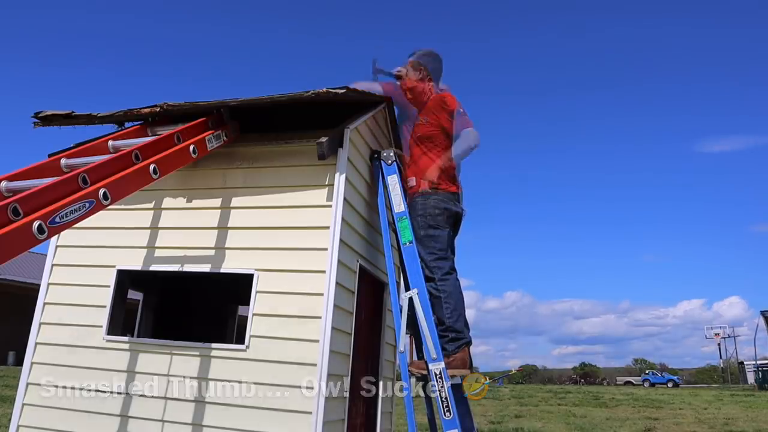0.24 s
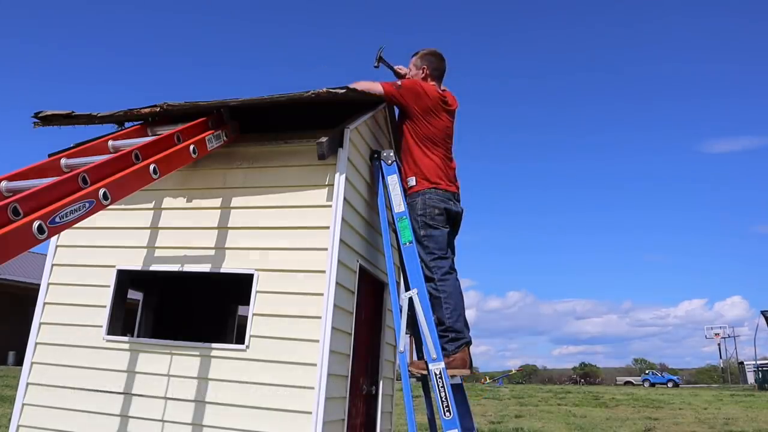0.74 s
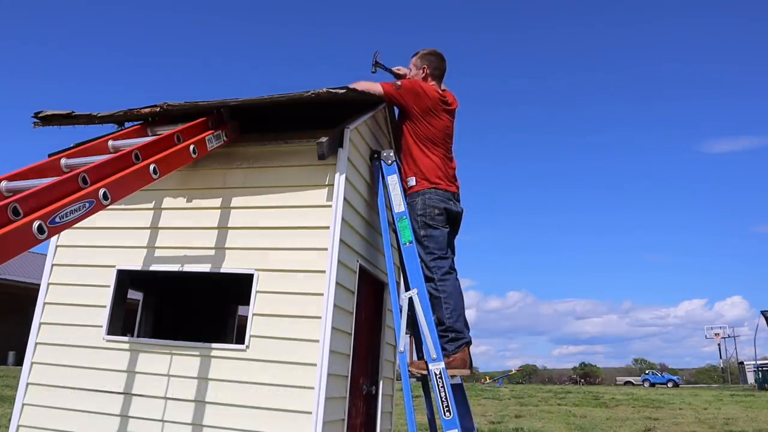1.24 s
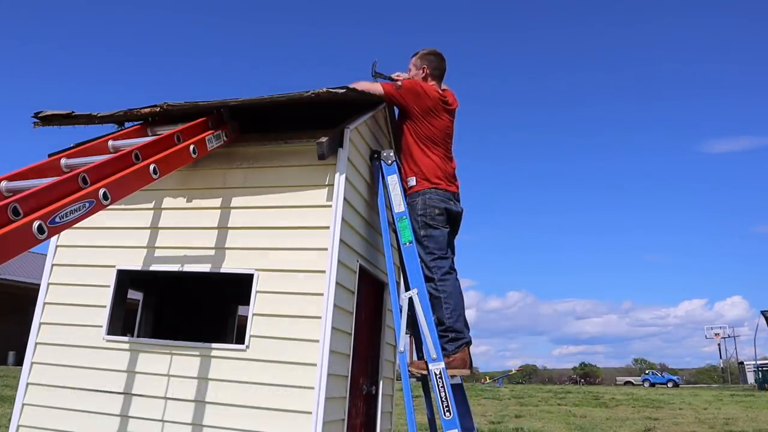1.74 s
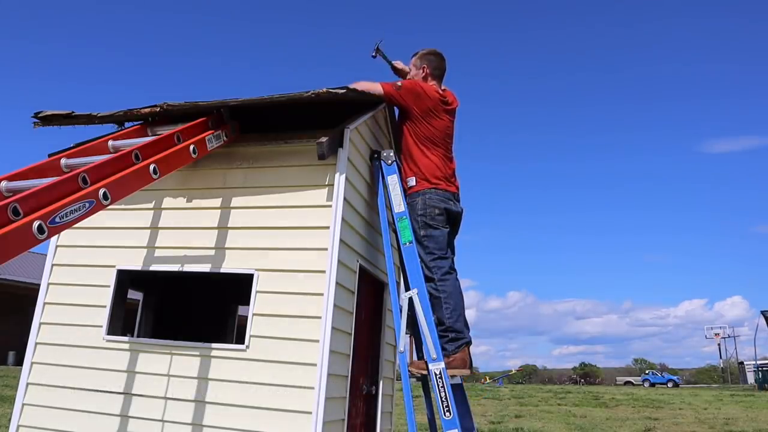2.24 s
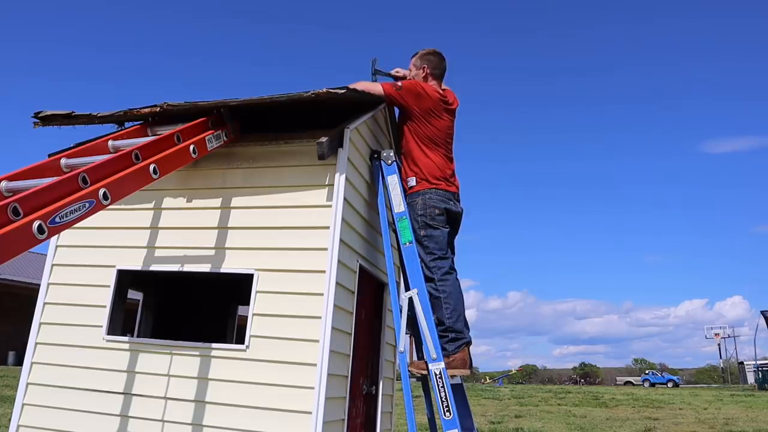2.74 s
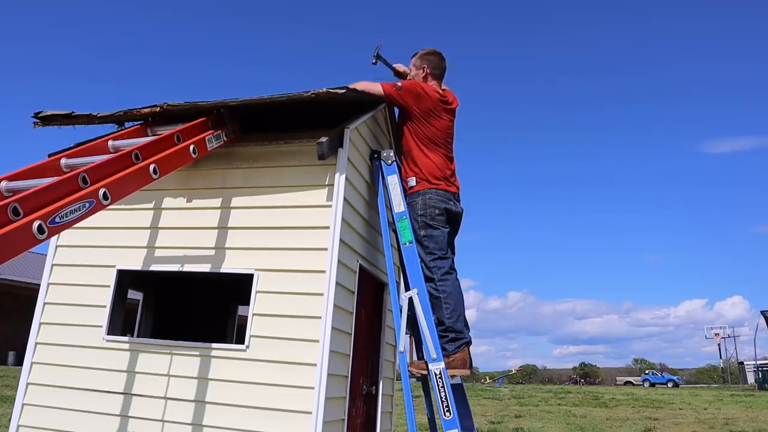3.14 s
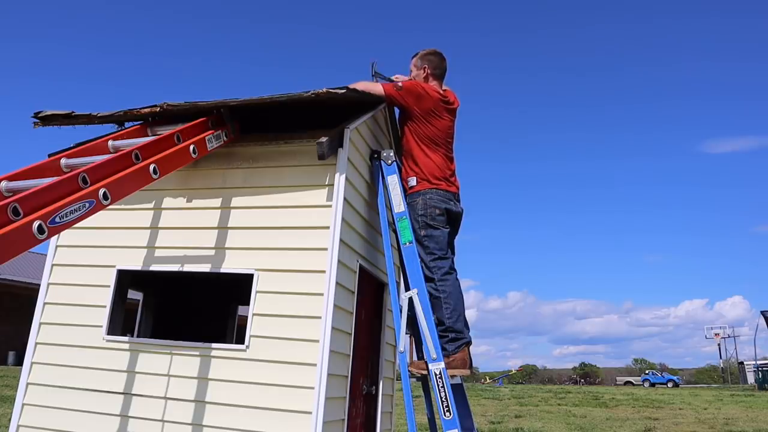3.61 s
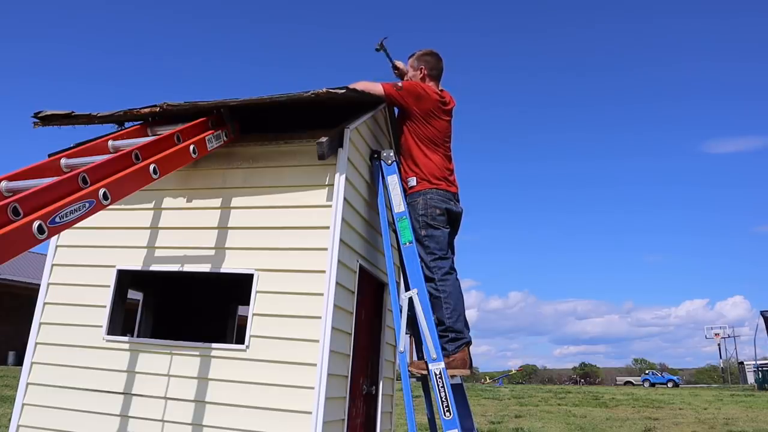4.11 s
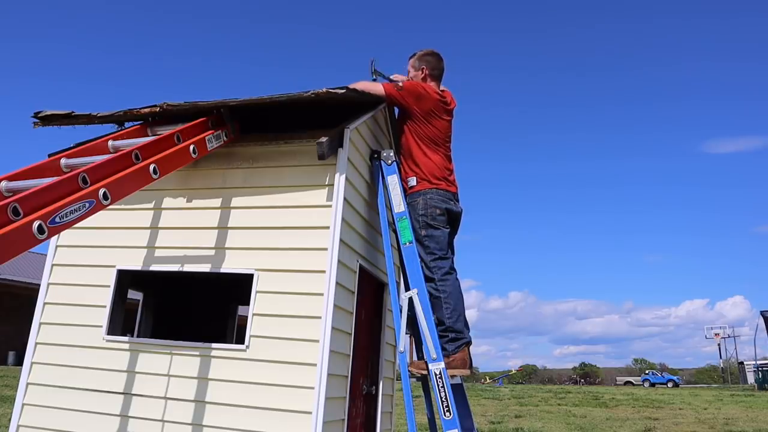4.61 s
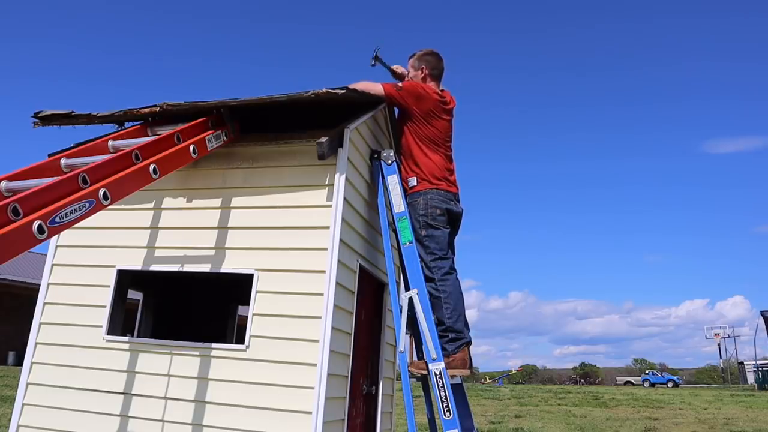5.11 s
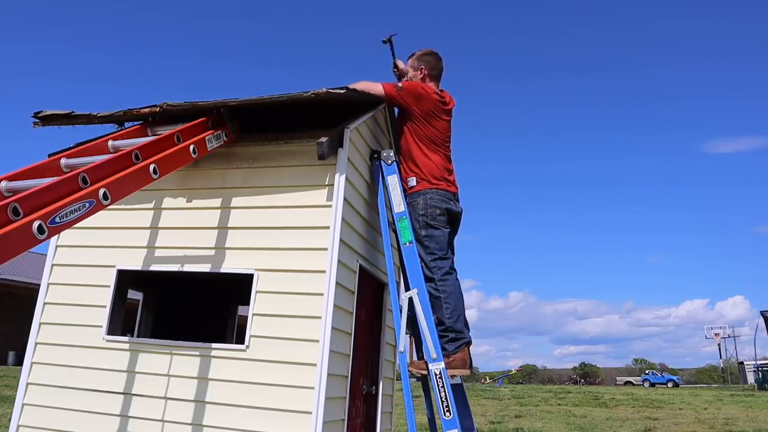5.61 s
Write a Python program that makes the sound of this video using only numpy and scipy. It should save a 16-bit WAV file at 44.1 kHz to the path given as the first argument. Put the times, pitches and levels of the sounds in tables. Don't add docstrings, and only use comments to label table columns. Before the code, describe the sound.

Outdoors on open grass, a hammer drives nails into a small shed's plank roof, heard from some metres away. Sharp, woody blows come about three a second, with hollow boom, rattle and faint ladder hum. Around four seconds one blow skids off with a twang and a loose shingle slaps; hammering resumes slightly slower and brighter. Wind buffets the microphone strongly at first, with faint traffic and hiss behind.

```python
import sys
import numpy as np
from scipy import signal
from scipy.fft import rfft, irfft, next_fast_len
from scipy.io import wavfile
from scipy.ndimage import map_coordinates

SR = 44100
rng = np.random.default_rng(int(sys.argv[2]) if len(sys.argv) > 2 else 0)


def amplitude_ratio(level_db):
    exponent = np.asarray(level_db, float) / 20
    return 10 ** exponent


def materialize(psi):
    bounded = np.clip(np.atleast_2d(psi).T, -1, 1)
    quanta = np.round(bounded * 32767).astype(np.int16)
    wavfile.write(sys.argv[1], SR, quanta)


N = 258426
LEAD = 0.005


def unit(x):
    return x / np.sqrt(np.mean(x ** 2) + 1e-20)


def scaled(x, t, length):
    return x / np.sqrt(np.mean(x[(t > 0) & (t < length)] ** 2))


def along(points, hz):
    f, v = np.transpose(points)
    return np.interp(np.log(hz + 1), np.log(f + 1), v)


def fade(t, t60):
    return amplitude_ratio(-60 * t / t60)


def sine(hz, t):
    return np.sin(2 * np.pi * hz * t)


def wobble(rate):
    knots = rng.standard_normal(int(N * rate / SR) + 4)
    return map_coordinates(knots, [np.arange(N) * rate / SR])


def filtered(x, response):
    m = next_fast_len(len(x) + 4096)
    return irfft(rfft(x, m) * response(np.fft.rfftfreq(m, 1 / SR)), m)[:len(x)]


def noise(spectrum, size):
    return unit(filtered(rng.standard_normal(size), lambda hz: amplitude_ratio(along(spectrum, hz))))


def add(track, s, sound):
    part = track[round(s * SR):][:len(sound)]
    part += sound[:len(part)]


# (frequency [Hz], level [dB per Hz])
WIND = [(12, -39), (20, -16), (75, -5.5), (103, -14), (136, -19), (173, -30), (220, -25), (290, -59.5),
        (480, -120)]
# (time [s], level over the breeze [dB], spread [s])
GUSTS = [
    (0, 13, 0.3),
    (1.19, 3.5, 0.046),
    (1.501, 4.5, 0.087),
    (1.859, 4.5, 0.079),
    (5.86, 6, .15),
]
# (frequency [Hz], level [dB per Hz])
TRAFFIC = [(150, -9.5), (300, 3.5), (500, 4.5), (800, 2), (1350, 0), (1800, -10.5), (3000, -21.5),
           (5000, -34), (7000, -56)]
# (time [s], level [dB])
ROAD = [(0, -40), (.25, -50), (.45, -47.5), (1, -57.5), (1.2, -56), (1.5, -51), (1.86, -47.5), (2.4, -55),
        (3.5, -59), (4.3, -58.5), (4.9, -69), (5.3, -60), (5.56, -65.5), (5.86, -57.5)]
# (frequency [Hz], level [dB per Hz])
HISS = [(1470, -26.5), (2500, 0.5), (2860, -17.5), (3090, -0.5), (15100, -5), (16300, -10)]


def background():
    t = np.arange(N) / SR
    gain_db = 20.5 * np.exp(-t / 0.82)
    gust_db = sum(db * np.exp(-((t - s) / spread) ** 2) for s, db, spread in GUSTS)
    wind = amplitude_ratio(-40 + 0.52 * gain_db + gust_db + 0.51 * wobble(4.5)) * noise(WIND, size=N)
    road_db = np.interp(t, *np.transpose(ROAD))
    traffic = amplitude_ratio(road_db + 1.4 * wobble(25)) * noise(TRAFFIC, size=N)
    hiss = amplitude_ratio(-74.5 + gain_db) * noise(HISS, size=N)
    return wind + traffic + hiss


def contact(t, width):
    dive = np.exp(-(t / width) ** 2)
    recoil = np.exp(-((t - 3 * width) / (3 * width)) ** 2) / 3
    return recoil - dive


def peak(f, centre_hz, width_hz):
    return 1j * f * width_hz / (centre_hz ** 2 - f * f + 1j * f * width_hz)


# (frequency [Hz], width [Hz], level [dB])
PLANKS = [(190, 37, 11), (413, 96, -7), (591.6, 45, 2.5), (934.5, 13, -4), (1050, 91, -1), (1461, 34, 8),
          (1664, 87, 5), (2070, 46, -6), (2460, 120, 0), (2820, 150, 0.5), (3300, 410, -3),
          (3770, 310, -5.5), (4850, 140, -16)]


def planks(f, scatter):
    total = 0
    for k, ((hz, width, db), u) in enumerate(zip(PLANKS, scatter)):
        total = total + (-1) ** k * amplitude_ratio(db + 4.5 * u) * peak(f, hz, width)
    return total


# (delay [s], level [dB])
REBOUNDS = [
    (0, 0),
    (.00125, -4),
    (.00245, -6),
    (.00305, -7),
]
# (delay [s], level [dB], pulse width [s])
PATHS = [
    (0, 1, 0.0001),
    (.00437, -1, 0.00029),
    (.0086, -6, .0002),
]


def knock(t, reach_db):
    path_shifts = 0.00006 * rng.standard_normal(len(PATHS))
    push = 0
    for delay, db in REBOUNDS:
        late, louder = rng.standard_normal(2)
        delay = delay + 0.00004 * late * (delay > 0)
        db = db + 1.5 * louder + (0.5 + 0.2 * reach_db) * (delay > 0)
        for (path_s, path_db, width), shift in zip(PATHS, path_shifts):
            arrival = delay + path_s + shift * (path_s > 0)
            push = push + amplitude_ratio(db + path_db) * contact(t - arrival, width)
    strike = contact(t, 0.0001) + amplitude_ratio(-8) * contact(t - PATHS[1][0], 0.0002)
    scatter = rng.standard_normal(len(PLANKS))
    ring = filtered(strike, lambda f: planks(f, scatter))
    return scaled(scaled(push, t, 0.01) + amplitude_ratio(-1) * scaled(ring, t, 0.01), t, 0.01)


def voiced(f, reach_db):
    clang = 1 + (amplitude_ratio(0.23 * reach_db) - 1) * peak(f, 1530, 700)
    thud = 1 + (amplitude_ratio(-0.14 * reach_db) - 1) * peak(f, 580, 250)
    return clang * thud


# (frequency [Hz], level [dB per Hz])
RATTLE = [(100, -9.5), (300, -0.5), (560, -9.5), (800, -9.5), (1100, -7), (1400, -14), (1800, -12.5),
          (2630, -21.5), (3860, -23.5), (6000, -37), (8000, -34), (9500, -47), (10200, -52), (16000, -58.5)]
# (frequency [Hz], time to fall 60 dB [s])
RATTLE_T60 = [(100, 0.47), (260, 0.26), (700, 0.19), (1800, 0.19), (4800, 0.15), (13000, 0.19)]


def rattle(t):
    hz, frames, z = signal.stft(noise(RATTLE, size=len(t)), SR, nperseg=256)
    z = z * fade(np.maximum(frames - LEAD, 0), along(RATTLE_T60, hz)[:, None])
    return signal.istft(z, SR, nperseg=256)[1][:len(t)]


# (frequency [Hz], level [dB per Hz])
CRACK = [(1500, -41), (2500, 1.5), (3960, -0.5), (5000, -5.5), (6310, -16), (8500, -11.5), (10800, -22.5),
         (13800, -29), (16400, -33.5)]


def crack(t, steel):
    bursts = amplitude_ratio(-15) * fade(np.abs(t), 0.011)
    for path_s, db, _ in PATHS:
        grass_db = -3 * (path_s > 0)
        t60 = np.where(t < path_s, 0.002, 0.012)
        bursts = bursts + amplitude_ratio(1.6 * db + grass_db) * fade(np.abs(t - path_s), t60)
    return scaled(bursts * (0.45 * steel + 0.55 * noise(CRACK, size=len(t))), t, 0.01)


def sizzle(t):
    grit_db = 4.5 * np.interp(t - t[0], np.arange(len(t)) / 370, rng.standard_normal(len(t)))
    return amplitude_ratio(grit_db) * fade(np.maximum(t, 0), 0.12) * noise(CRACK, size=len(t)) * (t > 0)


# (frequency [Hz], level [dB], time to fall 60 dB [s])
SHED = [(91.4, -7.5, 0.37), (164.8, -1, 0.12), (200.1, -4.5, 0.24), (219.8, -7.5, 0.26), (244, -7, 0.43),
        (269.4, -3.5, 0.31), (308.7, 3, 0.1), (428, -2, 0.15), (669, 0.5, 0.1), (761, -22.5, 0.1),
        (896, -11, 0.2), (947, -22.5, .2), (987, -18, 0.37)]


def walls(t, scatter):
    ring = sum(amplitude_ratio(db + 0.21 * u) * fade(t, t60) * sine(hz, t) for (hz, db, t60), u in zip(SHED, scatter))
    return -ring * (1 - np.exp(-t / 0.015))


# (frequency [Hz], level against the knock [dB], time to fall 60 dB [s])
LADDER = [(248, -27, .6), (470, -33, .5), (494, -26.5, .6), (516, -30, .5), (733, -35, .55), (746, -31, .6),
          (870, -24, .2), (985, -22, .22)]


def ladder(t, reach_db):
    ring = 0
    for hz, db, t60 in LADDER:
        u = rng.standard_normal()
        ring = ring + amplitude_ratio(db + 1.7 * u) * fade(t, t60) * sine(hz * (1 + 0.003 * u), t)
    swell = 1 - np.exp(-t / 0.02)
    return amplitude_ratio(0.1 + 0.36 * reach_db) * ring * swell * np.clip((t[-1] - t) / 0.05, 0, 1)


# (frequency [Hz], level [dB per Hz])
YARD = [(100, -11.5), (300, -3), (900, 4.5), (1600, -3.5), (2200, -10.5), (4000, -20), (8000, -39),
        (16000, -58)]


def yard(after):
    return fade(after, 0.99) * noise(YARD, size=len(after)) * (1 - np.exp(-after / 0.015))


# (delay [s], time to fall 60 dB [s], level [dB], level per dB of reach [dB])
ECHOES = [
    (0.133, 0.11, -30.5, 1.22),
    (0.231, 0.059, -35, 0.4),
]
# (frequency [Hz], level [dB per Hz])
FAR = [(200, -19), (700, -8.5), (1150, 1), (1550, 4), (2000, -9.5), (4000, -18), (8000, -33.5),
       (16000, -45)]


def echoes(t, reach_db):
    level = 0
    for delay, t60, db, per_reach in ECHOES:
        attack = np.clip((t - delay) / 0.01, 0, 1)
        level = level + amplitude_ratio(db + per_reach * reach_db) * attack * fade(np.maximum(t - delay, 0), t60)
    return level * noise(FAR, size=len(t))


# (time [s], knock [dB], steel against it [dB], reach toward the far buildings against it [dB])
BLOWS = [(0.1709, -15, -13, -25.5), (0.4906, -9, -9, -19.5), (0.787, -8, -8, -11), (1.0917, -9, -7.5, -1.5),
         (1.4095, -9, -10.5, 2.5), (1.7218, -10, -11.5, 6.5), (2.0415, -10.5, -9.5, 2.5),
         (2.3598, -10.5, -12, -1), (2.6643, -11.5, -11, 1), (2.9777, -11.5, -10.5, 2),
         (3.2906, -11.5, -8, 1.5), (3.6099, -11.5, -10.5, 1.5), (4.2982, -12, -3.5, -4.5),
         (4.6447, -12, -6, -4), (5.0105, -11.5, -5.5, -0.5), (5.38, -11.5, -4.5, -5),
         (5.7417, -11.5, -2.5, -0.5)]


def hammer():
    track = np.zeros(N)
    t = np.arange(SR * 2 // 5) / SR - LEAD
    after = np.maximum(t, 0)
    usual = rattle(t)
    steel = noise(CRACK, size=len(t))
    for s, db, steel_db, reach_db in BLOWS:
        shake = amplitude_ratio(-7.5) * (1.51 * usual + 1.17 * rattle(t)) * (1 - np.exp(-after / 0.0005))
        blow = filtered(amplitude_ratio(1.68) * knock(t, reach_db) + shake, lambda f: voiced(f, reach_db))
        blow += amplitude_ratio(steel_db - 1.3) * crack(t, steel)
        boom = scaled(walls(after, rng.standard_normal(len(SHED))), t, 0.056)
        blow += amplitude_ratio(-15 - 0.23 * reach_db) * boom
        blow += ladder(after, reach_db)
        blow += amplitude_ratio(steel_db - 11) * sizzle(t)
        blow += amplitude_ratio(-35.5) * yard(after)
        blow += echoes(t, reach_db)
        add(track, s - LEAD, amplitude_ratio(db) * blow)
    return filtered(track, lambda hz: 1j * hz / (70 + 1j * hz))


# (time [s], peak level [dB])
TICKS = [(2.159, -49), (3.2212, -57.5), (3.261, -60), (3.5734, -51), (3.838, -59), (4.075, -55),
         (4.185, -54), (4.2443, -57), (4.583, -59), (4.632, -57), (4.745, -55), (4.8394, -59),
         (4.8677, -58.5), (4.9272, -57.5), (5.2335, -54.5), (5.25, -58.5), (5.2883, -54), (5.296, -54),
         (5.313, -57.5), (5.521, -53.5), (5.666, -57)]
# (frequency [Hz], level [dB])
TICK_RINGS = [(6700, -2), (8300, -0.5)]


def ticks():
    track, t = np.zeros(N), np.arange(SR // 25) / SR
    colour = [(1000, -29), (4000, 12), (8500, 15.5), (12000, -7.5)]
    for s, db in TICKS:
        grain = amplitude_ratio(-7.5) * fade(t, 0.03) * noise(colour, size=len(t))
        ring = sum(amplitude_ratio(level) * sine(hz, t) for hz, level in TICK_RINGS)
        ring = amplitude_ratio(-25.5 + 2.5 * (db + 55)) * fade(t, 0.07) * ring
        add(track, s, amplitude_ratio(db) * (grain + ring))
    return track


# (time [s], tick [dB], twang [dB], twang length [s])
GLANCE = (3.9353, -7, -15, .028)
# (frequency [Hz], level [dB])
TWANG = [(818, 0), (1220, -15), (1650, -26), (2850, -26)]


def skid():
    track, t = np.zeros(N), np.arange(SR // 3) / SR
    s, tick_db, twang_db, length = GLANCE
    tick = 0.3 * contact(t - 0.0002, 0.0001) - np.exp(-((t - 0.0007) / 0.00011) ** 2)
    colour = [(1500, 2.5), (3700, 4), (5500, -13), (9000, -14.5), (16000, -42)]
    scrape = amplitude_ratio(-13) * fade(t, 0.0063) * noise(colour, size=len(t))
    swell = np.sin(np.pi * np.clip(t / length, 0, 1) ** 0.5)
    twang = sum(amplitude_ratio(db) * sine(hz, t) for hz, db in TWANG) + amplitude_ratio(-22) * noise(RATTLE, size=len(t))
    add(track, s, amplitude_ratio(tick_db) * tick + scrape + amplitude_ratio(twang_db) * swell * twang)
    return track


def slap():
    since = np.maximum(np.arange(N) / SR - 3.963, 0)
    late = np.maximum(since - 0.036, 0)
    flap = noise(RATTLE, size=N)
    low = filtered(flap, lambda hz: 1 / (1 + (hz / 1487) ** 2))
    flap = fade(late, 0.26) * low + fade(late, 0.11) * (flap - low)
    track = amplitude_ratio(-24.5 + 1.9 * wobble(200)) * np.clip(since / 0.0037, 0, 1) * flap
    boom = unit(walls(np.arange(SR // 3) / SR, np.zeros(len(SHED))))
    add(track, 3.985, amplitude_ratio(-35.5) * boom)
    return track


def glancing_blow():
    track = skid() + slap()
    delayed = np.roll(track, round(ECHOES[0][0] * SR))
    return track + amplitude_ratio(-23) * filtered(delayed, lambda hz: amplitude_ratio(along(FAR, hz)))


def scene():
    return (background() + hammer() + ticks() + glancing_blow())[None]


def top_cut(x):
    return signal.sosfilt(signal.butter(12, 16480, fs=SR, output="sos"), x)


def record(dry):
    clipped = dry / (1 + np.abs(dry) ** 16) ** (1 / 16)
    limited = filtered(clipped[0], lambda hz: 1 / (1 + (hz / 15900) ** 60))
    finished = np.clip(limited, -1, 1)[None]
    return top_cut(finished)


dry = scene()
out = record(dry)
materialize(out)
```